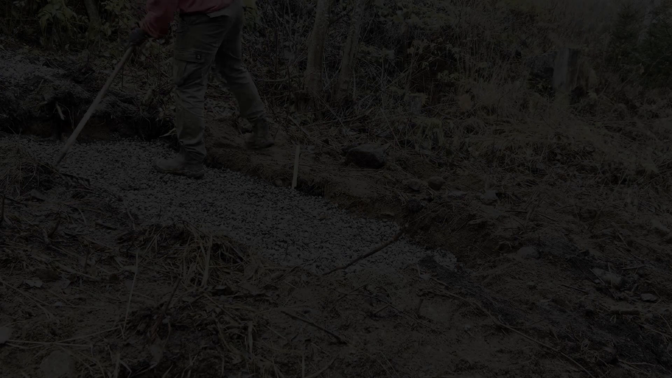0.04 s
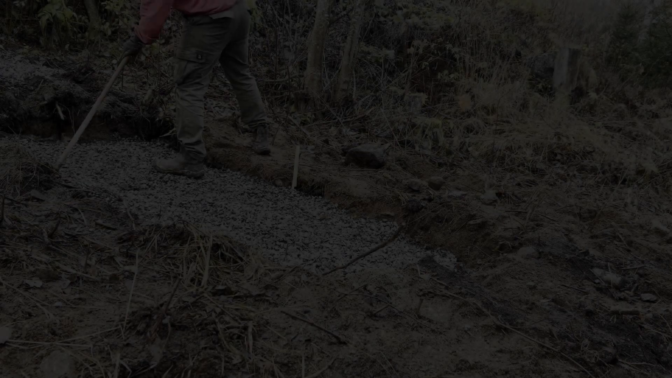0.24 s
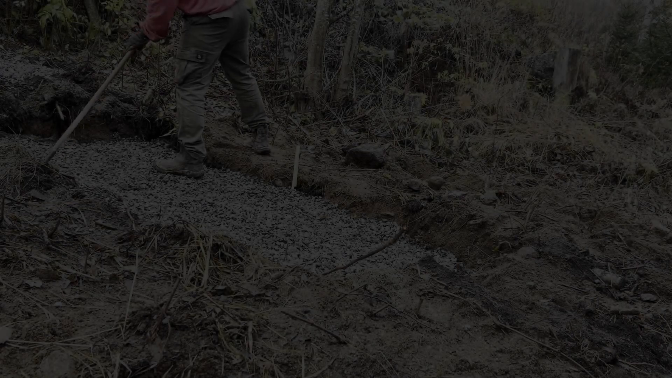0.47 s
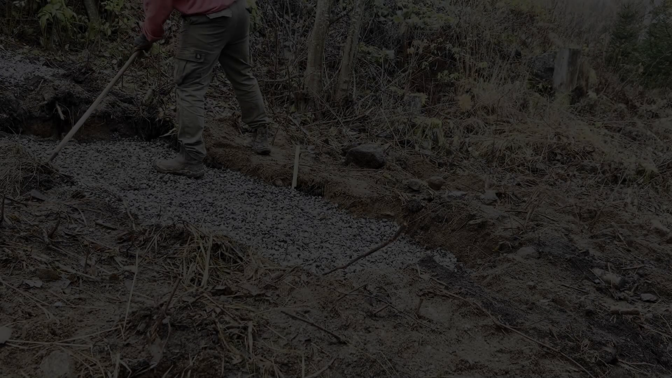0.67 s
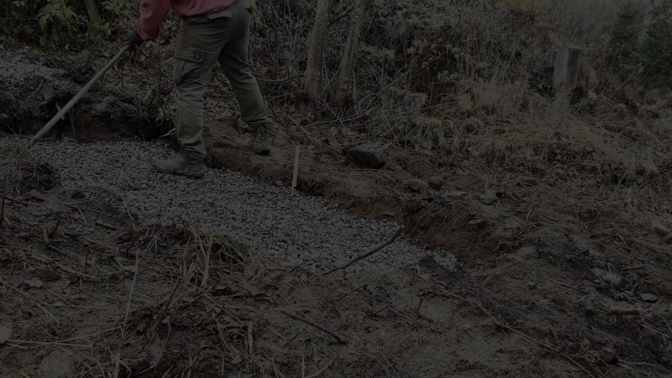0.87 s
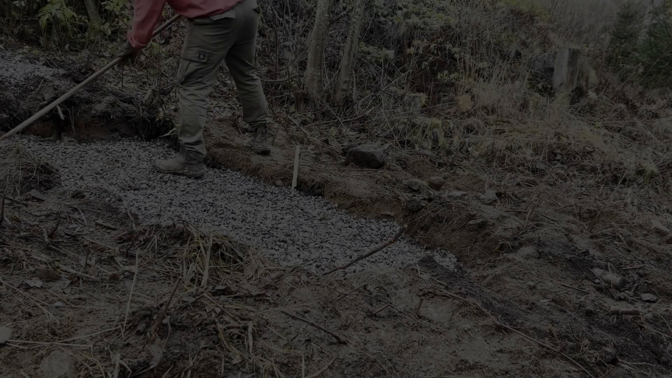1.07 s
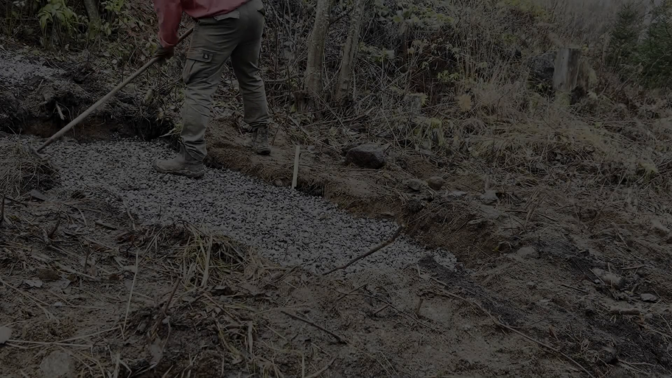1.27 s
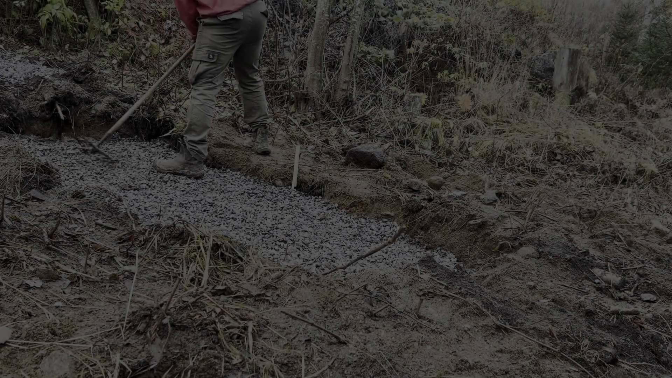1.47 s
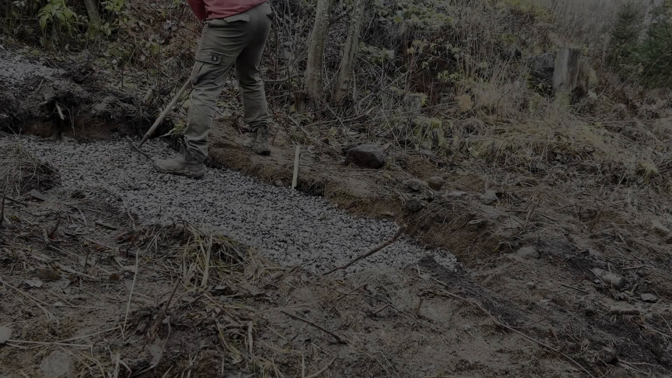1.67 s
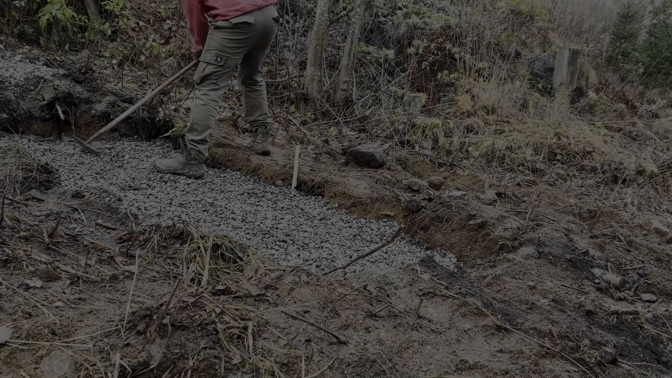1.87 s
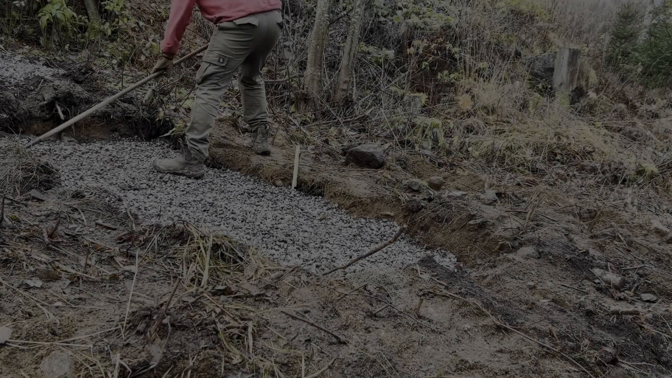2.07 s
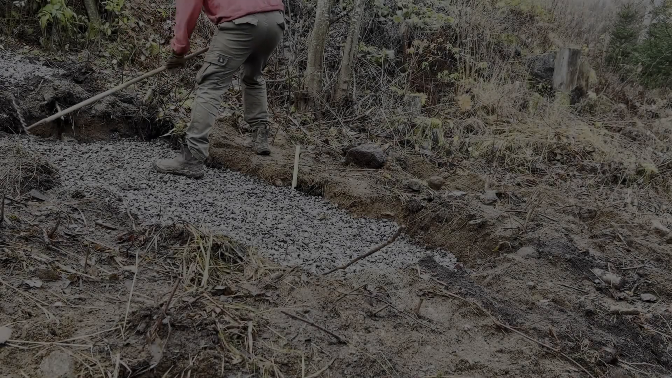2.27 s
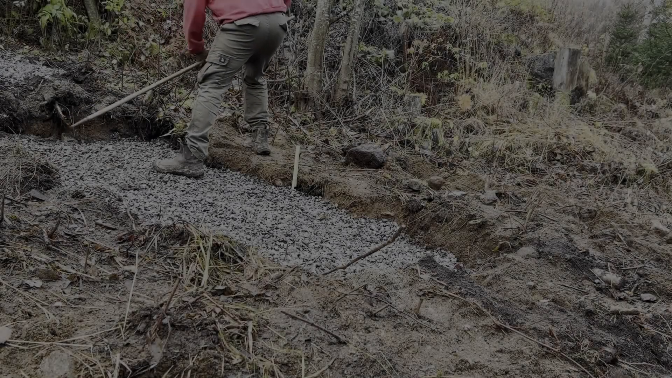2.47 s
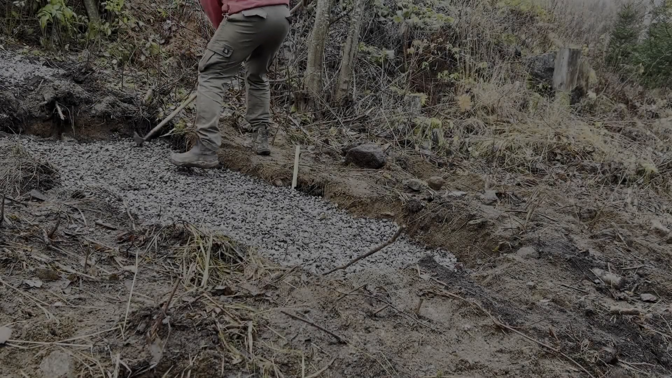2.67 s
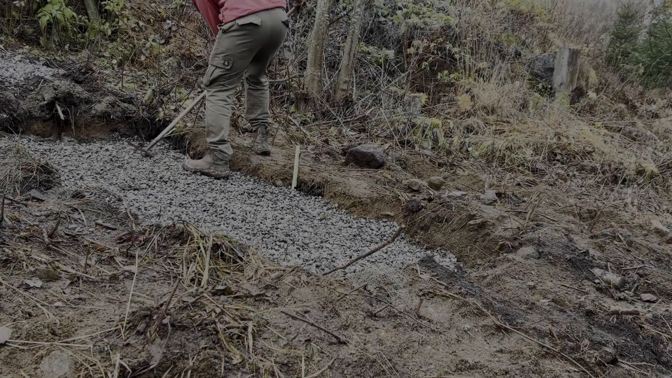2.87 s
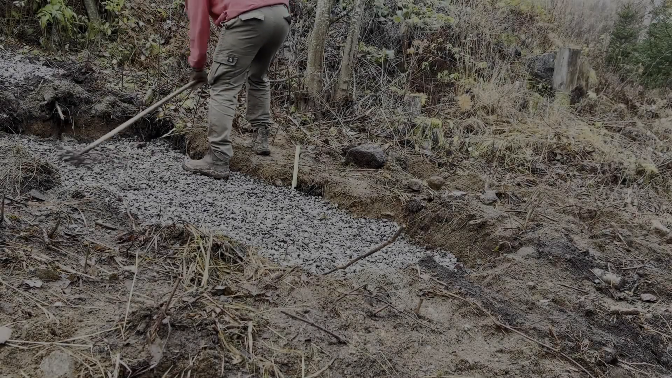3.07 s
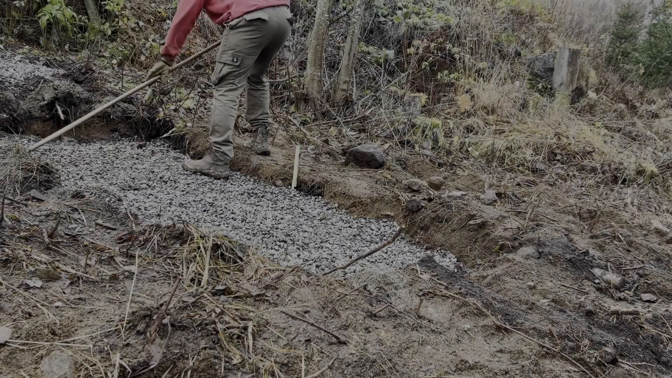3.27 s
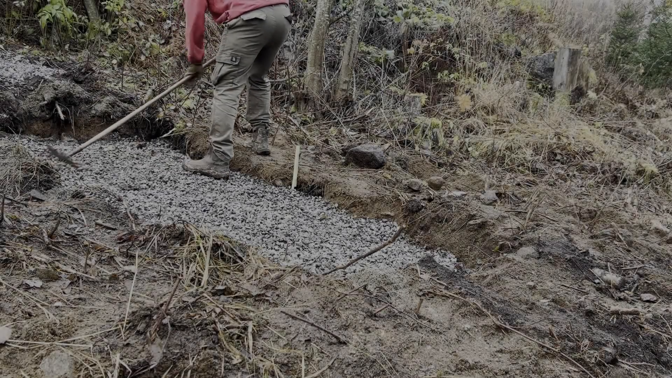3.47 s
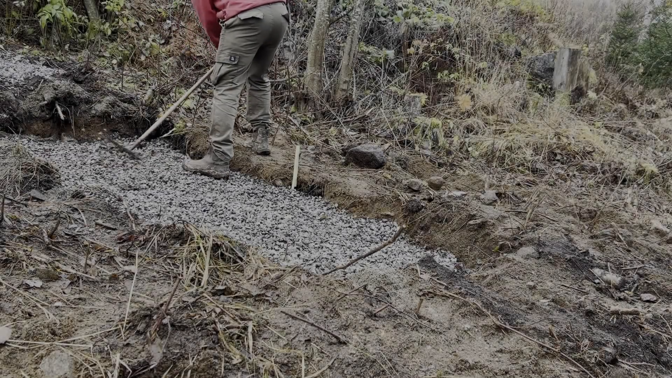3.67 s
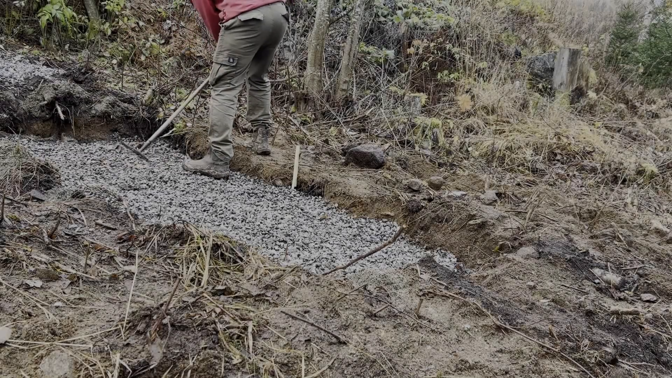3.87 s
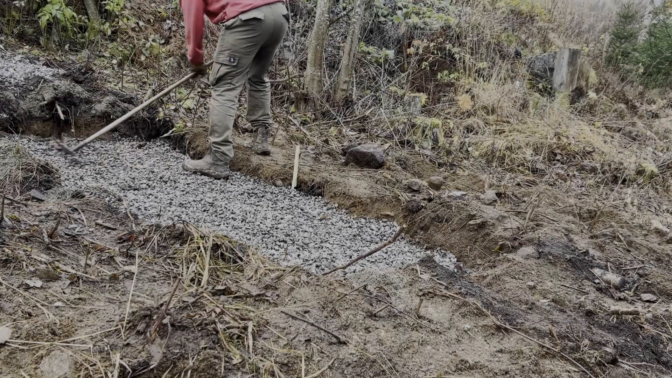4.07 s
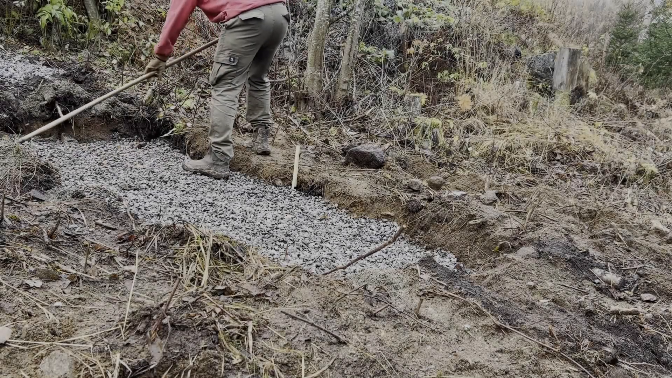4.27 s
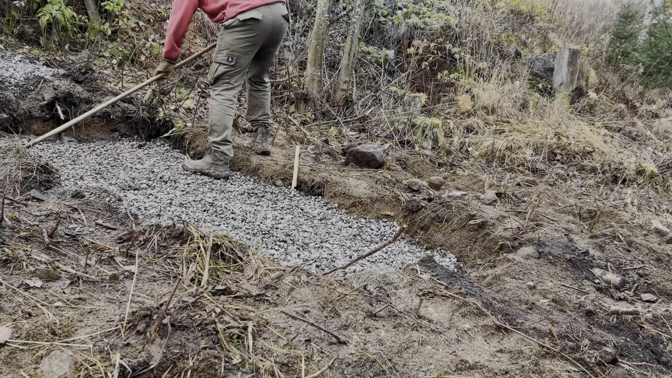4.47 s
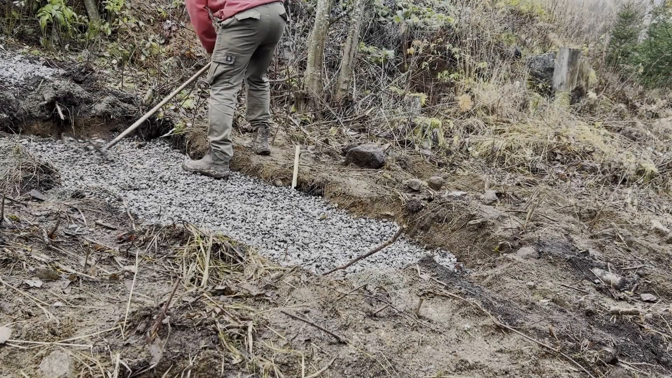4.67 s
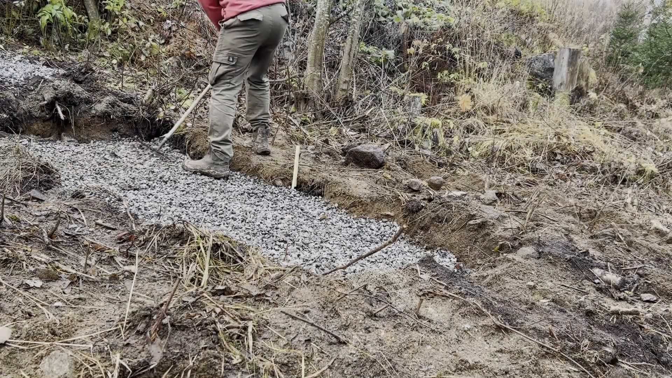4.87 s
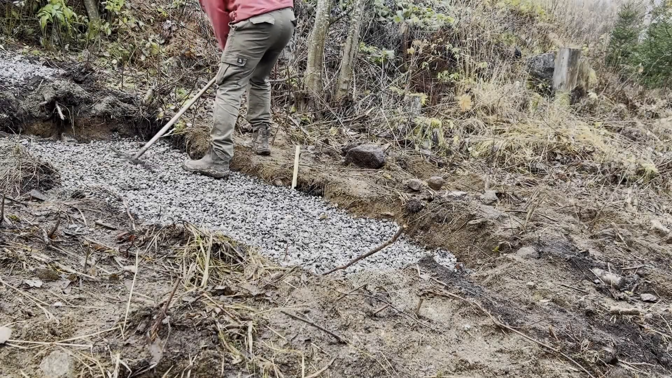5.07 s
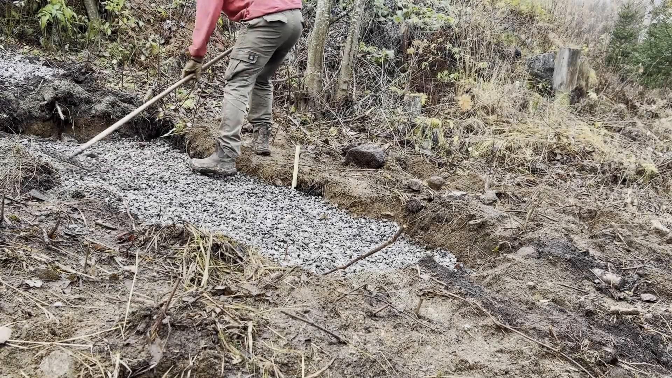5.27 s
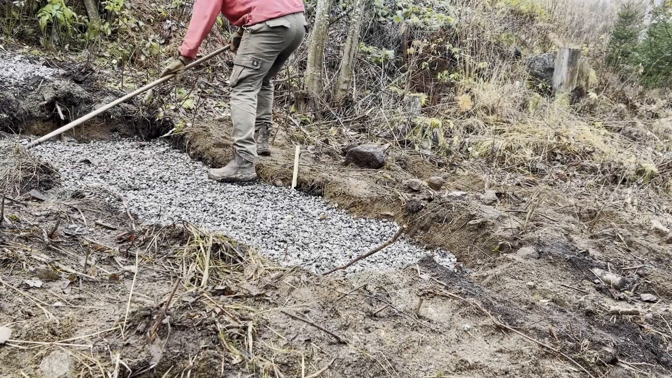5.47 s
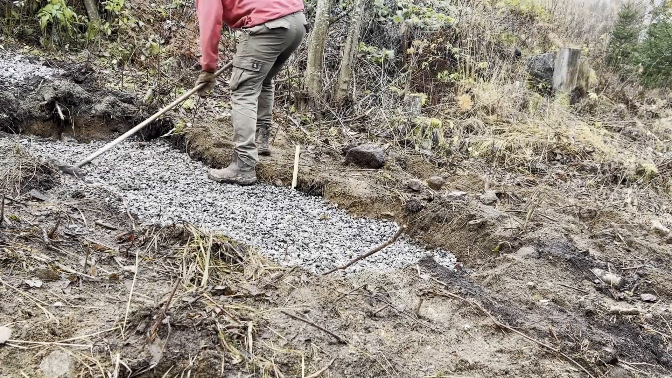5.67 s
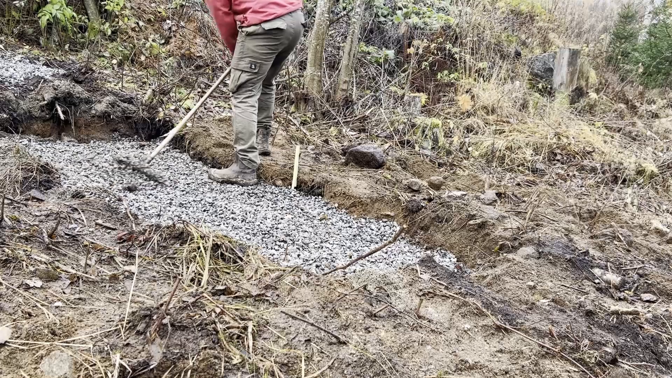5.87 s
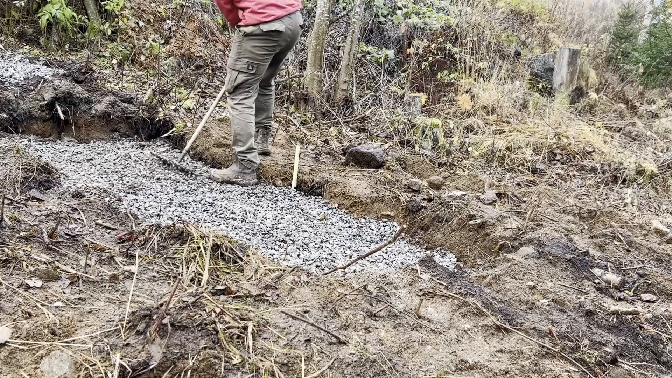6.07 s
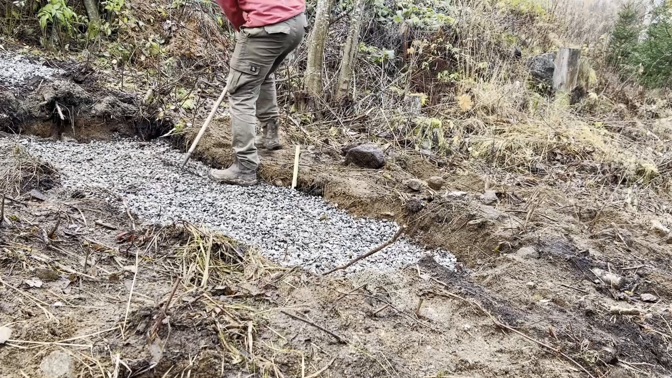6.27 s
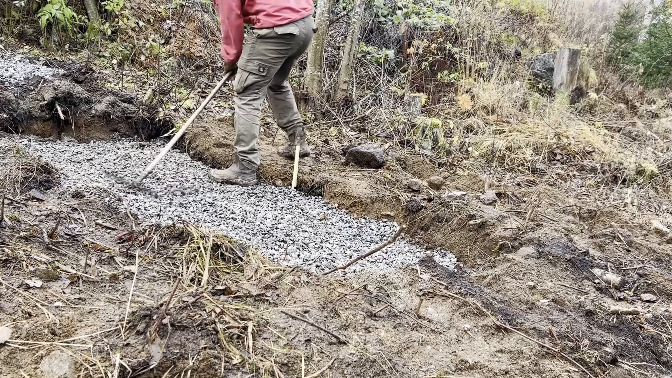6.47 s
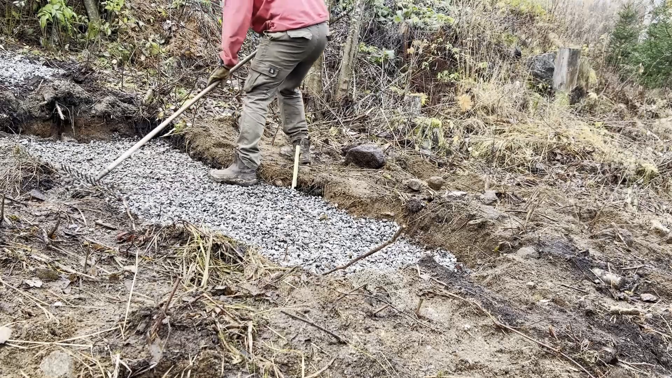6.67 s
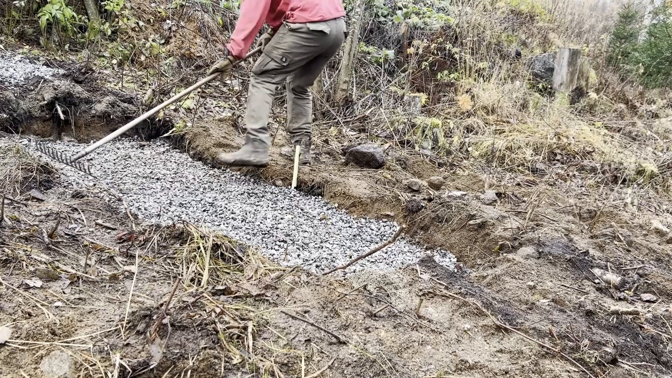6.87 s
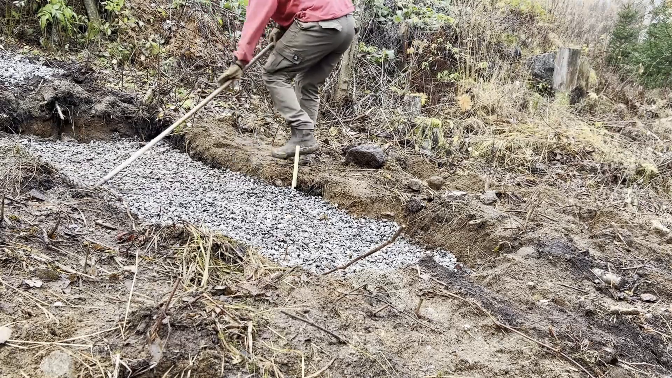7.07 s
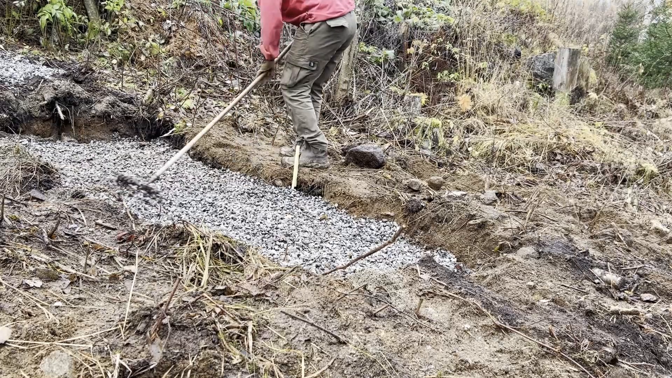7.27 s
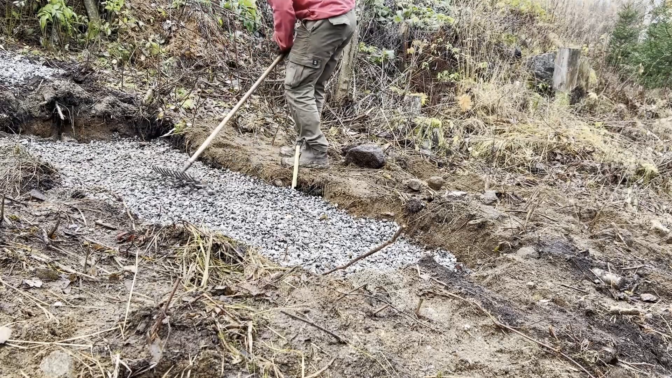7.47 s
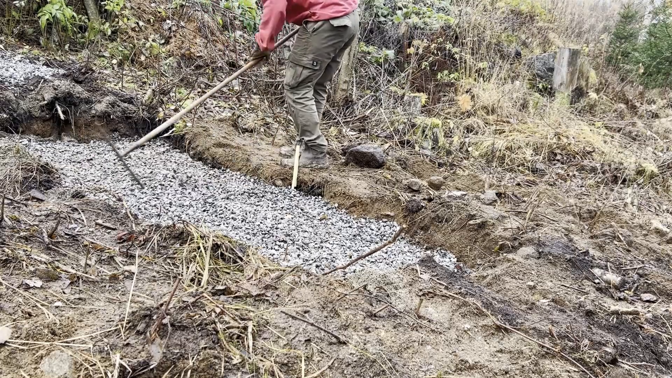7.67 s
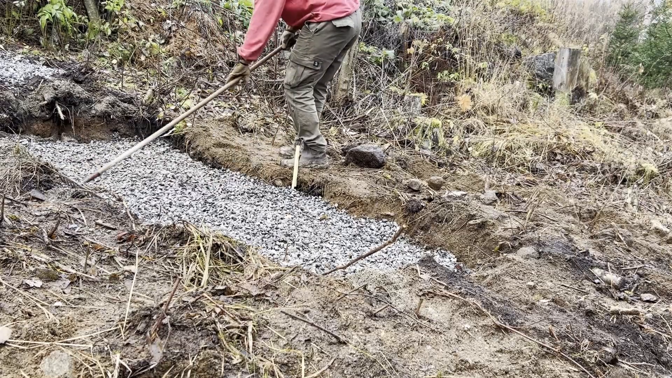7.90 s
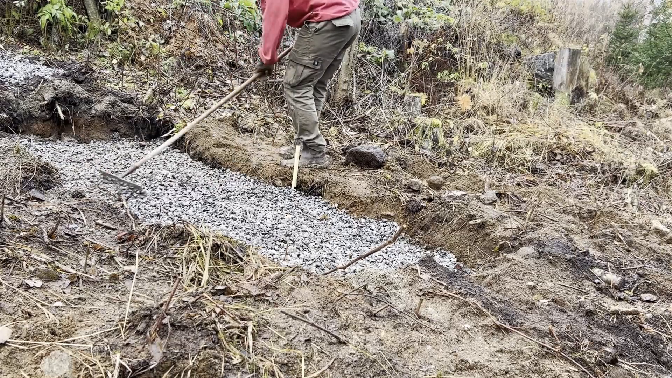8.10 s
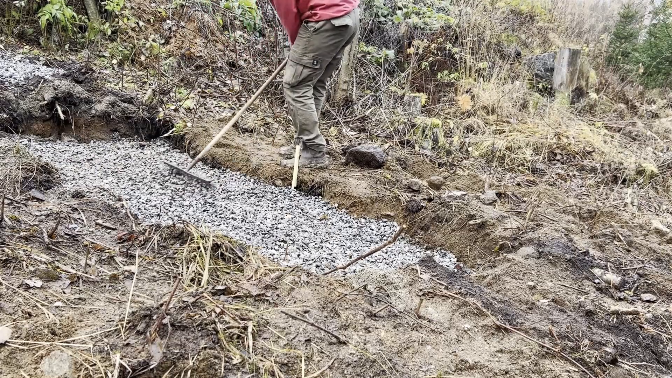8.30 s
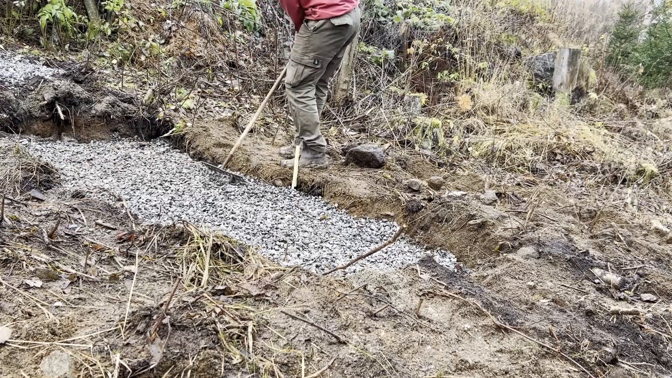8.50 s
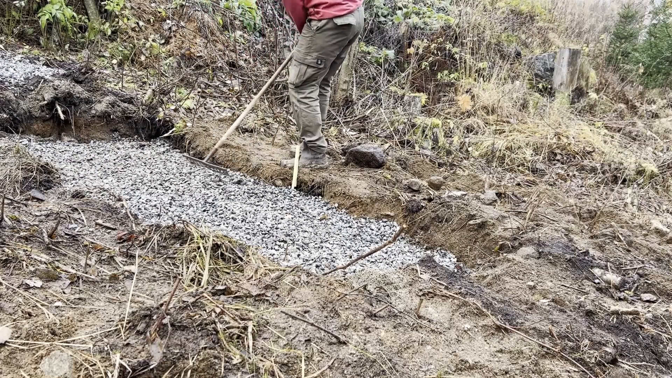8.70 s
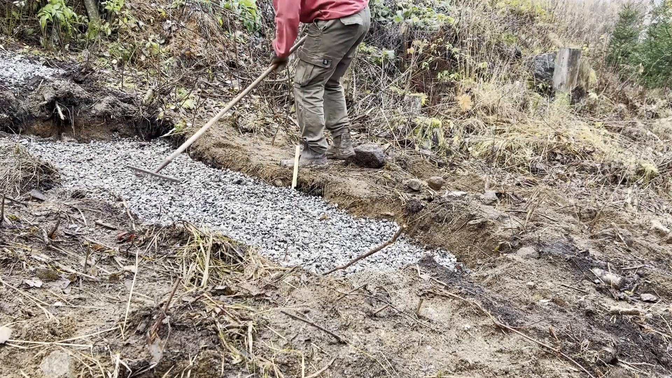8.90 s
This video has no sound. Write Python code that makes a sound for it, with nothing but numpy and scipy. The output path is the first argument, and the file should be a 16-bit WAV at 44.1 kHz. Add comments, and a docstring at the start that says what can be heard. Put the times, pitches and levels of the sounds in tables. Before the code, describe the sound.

Repeated gritty scrapes of a metal rake spreading gravel, with sharp clinks, soft thuds and trickling chips in quiet open air.

```python
"""A gritty crunch swells as a steel rake is drawn through crushed gravel in a trench outdoors.
Stroke after stroke, colliding chips, pebbles and coarse stones ring briefly, the smaller the higher;
the tines clink in their natural modes, the bed thuds, shoved stones judder and chips trickle after.
Single stones snap together, a breeze briefly buffets the microphone, and boots scuff the soil.
The trench walls and the trees reflect the work, which is heard from the left over faint open air."""
import sys
import numpy as np
from scipy import signal
from scipy.fft import rfft, irfft, next_fast_len
from scipy.io import wavfile
from scipy.ndimage import uniform_filter1d, map_coordinates

SR = 44100
rng = np.random.default_rng(int(sys.argv[2]) if len(sys.argv) > 2 else 0)


def int16_out(signal):
    """Quantize to a 16-bit WAV file."""
    q = np.round(np.clip(np.atleast_2d(signal).T, -1, 1) * 32767)
    wavfile.write(sys.argv[1], SR, q.astype(np.int16))


N = 394298


def amp(db):
    """Amplitude ratio of a level in decibels."""
    return 10 ** (np.asarray(db) / 20)


def unit(x):
    """Normalisation to rms 1."""
    return x / np.sqrt(np.mean(x ** 2) + 1e-20)


def steady(x, span_s):
    """Normalisation by the running rms: the grain stays, slow swells go."""
    return x / np.sqrt(np.abs(uniform_filter1d(x ** 2, max(int(span_s * SR), 2))) + 1e-20)


def wobble(rate):
    """Smooth random modulation: a spline through rate Gaussian knots a second."""
    knots = rng.standard_normal(4096)
    return map_coordinates(knots, [np.arange(N) * rate / SR], mode="wrap")


def filtered(x, response):
    """Linear filtering: the spectrum of x times a complex frequency response."""
    size = next_fast_len(x.shape[-1] + 8192)
    return irfft(rfft(x, size) * response(np.fft.rfftfreq(size, 1 / SR)), size)[..., :x.shape[-1]]


def coloured(x, spectrum):
    """Spectral shaping by (f/Hz, level/dB) points, at rms 1."""
    f, db = np.transpose(spectrum)
    return unit(filtered(x, lambda hz: amp(np.interp(np.log(hz + 1), np.log(f), db))))


def add(track, s, sound):
    """Superposition of a sound on a track at time s."""
    part = track[max(round(s * SR), 0):][:len(sound)]
    part += sound[:len(part)]


def drifting(x, responses, hop):
    """Time-varying convolution: impulse responses cross-fade, one every hop samples."""
    padded, window = np.pad(x, (hop, 2 * hop)), signal.get_window("hann", 2 * hop)
    out = np.zeros((responses.shape[1], N + SR))
    for start, response in zip(range(0, N + hop, hop), responses):
        piece = signal.fftconvolve((padded[start:start + 2 * hop] * window)[None], response, axes=1)
        out[:, start:start + piece.shape[1]] += piece
    return out[:, hop:hop + N]


def contacts(rate, spread_db, count):
    """A thinned point process of even mean power: each contact's sample, size and 0-1 stone shape."""
    when, chance, size, shape = rng.random((count, 4)).T
    at = (when * N).astype(int)
    share = np.minimum(rate[at] * N / SR / count, 1)
    keep = chance < share
    size = amp(spread_db * np.minimum(-np.log(size), np.pi)) / np.sqrt(share)
    return at[keep], size[keep], shape[keep]


def grains(at, size, shape, low_hz, high_hz, cycles, samples):
    """Damped free vibration: each contact rings a stone at its own pitch, down to 1/e after cycles."""
    hz = (low_hz + (high_hz - low_hz) * shape)[:, None]
    turns = hz * np.arange(samples) / SR
    rings = size[:, None] * np.sqrt(hz) * np.exp(-turns / cycles) * np.sin(2 * np.pi * turns)
    return np.bincount((at[:, None] + np.arange(samples)).ravel(), rings.ravel(), N + samples)[:N]


ENGAGE_S, SAG_DB, RELEASE_DB_PER_S = 0.0048, 13, 162  # the tines engage, the pull sags, the rake lets go
ARCH = 1.65  # exponent of the pull's arch: the higher, the flatter its top
CHIP_GROWTH, SCRAPE_GROWTH = 1.65, 1.06  # dB per dB of pull: a faster rake throws more chips
PEBBLE_FINENESS = 0.39  # pebbles move like coarse stones (0) or like small chips (1)
SETTLE_DB_PER_S, TRICKLE_CHIPS_DB = 79, 2.5  # the heap trickles on after a drag, mostly small chips
REST_DB = -99  # the bed between drags
# Pulls of the rake: start t/s, rise/s, fall/s, coarse-stone peak level/dB, swell to the peak/dB,
# then level/dB re that peak of chips, pebbles, trickle, steel scrape. All tables give relative levels.
RAKE_PULLS = [(0.0, 0.025, 0.12, -57.5, 0.45, -1, -2, -10, -5),
              (0.188, .16, 0.046, -46, 1.1, -2.5, 2, -5, -7.5),
              (0.494, 0.22, 0.071, -48.5, 8.6, -0.5, 3.5, -7, -10),
              (1.002, 0.27, 0.19, -46, 13.4, 2.5, 4.5, -3, -2),
              (1.508, 0.12, 0.07, -44.5, 5.5, 4, 5.5, -10, -16),
              (1.718, 0.14, 0.03, -44, 8.3, 7, 5.5, -17, -4),
              (1.936, 0.044, 0.089, -39.5, 2.6, 5, 4, -24, -5),
              (2.335, 0.03, 0.019, -44.5, 22, -5.5, 2, -12, -1),
              (2.469, 0.016, 0.17, -64.5, 0.88, 2, 3, 1, -17),
              (2.756, 0.3, 0.23, -44.5, 7.4, 9, 8.5, -33, -3),
              (3.299, 0.074, 0.037, -51, 3.5, -2.5, 8.5, -1, -4),
              (3.397, 0.11, 0.25, -43.5, 5.3, 7.5, 8.5, -8.5, 2),
              (3.864, 0.21, 0.15, -42.5, 8.3, 8, 7, -17.5, 0),
              (4.418, 0.2, 0.16, -43.5, 13, 7, 6, -16.5, 2),
              (4.802, 0.012, 0.16, -55.5, 2.1, 11.5, 12, -6.5, -18),
              (4.994, 0.13, 0.094, -41, 7, 8, 7.5, -15, -10),
              (5.463, 0.0068, 0.091, -58.5, 3, 5.5, 6, -11, -9),
              (5.595, 0.23, 0.42, -43, 7, 9.5, 9, -16.5, -5.5),
              (6.297, 0.13, 0.069, -43.5, 6, 11.5, 7.5, -18, -1.5),
              (6.483, 0.019, 0.13, -37.5, 1, 6.5, 3, -17, -2.5),
              (7.061, 0.21, 0.21, -43, 6.5, 8.5, 7.5, -21, -11),
              (7.438, 0.066, 0.18, -58.5, 2, 17.5, 15, -19.5, -14),
              (7.906, 0.31, 0.235, -41.5, 15.2, 10, 10, -21.5, -1.5),
              (8.463, 0.068, 0.08, -57, 12, 14.5, 12.5, -32, 5)]


def drags():
    """Incoherent sources add in power: the pulls' envelopes for chips, pebbles, stones and steel."""
    t, power = np.arange(SR + SR // 4) / SR, np.zeros((4, N))
    for start, rise, fall, db, swell_db, chips_db, pebbles_db, trickle_db, scrape_db in RAKE_PULLS:
        to_peak, past_peak = np.clip(1 - t / rise, 0, 1), np.clip((t - rise) / fall, 0, 1)
        after = np.maximum(t - rise - fall, 0)
        pull_db = -swell_db * to_peak ** ARCH - SAG_DB * past_peak ** ARCH - RELEASE_DB_PER_S * after
        engaged = np.minimum(t / ENGAGE_S, 1)
        trickle = past_peak * amp(trickle_db - SETTLE_DB_PER_S * after)
        coarse = np.hypot(engaged * amp(pull_db), trickle)
        fine = np.hypot(engaged * amp(CHIP_GROWTH * pull_db), amp(TRICKLE_CHIPS_DB) * trickle)
        middling = coarse ** (1 - PEBBLE_FINENESS) * fine ** PEBBLE_FINENESS
        scrape = engaged * amp(scrape_db + SCRAPE_GROWTH * pull_db)
        stirs = amp(chips_db) * fine, amp(pebbles_db) * middling, coarse, scrape
        for track, stir in zip(power, stirs):
            add(track, start, (amp(db) * stir) ** 2)
    return np.sqrt(power + amp(REST_DB) ** 2)


# The rake head bites into the bed: t/s, chip level/dB, coarse-stone level/dB, duration/s
RAKE_BITES = [(0.23, -27.5, -35, 0.0095), (0.503, -41.5, -40, 0.026), (1.017, -43, -43.5, 0.048),
              (1.43, -30, -47, 0.011), (1.52, -30, -42, 0.02), (1.579, -32, -36, 0.0072),
              (1.876, -32, -50, 0.016), (2.175, -60.5, -47, 0.03), (2.297, -53, -49.5, 0.04),
              (2.334, -36, -44.5, 0.02), (2.67, -31.5, -36, 0.032), (3.098, -18.5, -41, 0.0057),
              (3.24, -46, -44, 0.0075), (3.593, -28.5, -42.5, 0.051), (4.35, -66, -49, 0.046),
              (4.581, -36.5, -48, 0.029), (4.677, -27.5, -45, 0.046), (5.114, -26, -41, 0.016),
              (5.192, -32, -42.5, 0.042), (5.595, -38, -32, 0.013), (5.767, -30, -35.5, 0.014),
              (6.155, -34, -43, 0.011), (6.449, -21.5, -43, 0.008), (6.495, -30.5, -41, 0.013),
              (7.063, -29.5, -31.5, 0.014), (7.323, -31, -43, 0.048), (7.907, -33.5, -35, 0.028),
              (8.235, -25, -35, 0.014), (8.275, -31.5, -39, 0.028), (8.337, -30, -35.5, 0.017)]


def agitation(chip_bite_db, pebble_bite_db, stone_bite_db, steel_bite_db, jerk_db):
    """Sustained and impulsive excitation: jerky drags and bites stir chips, pebbles, stones and steel."""
    stirs = drags() * amp(jerk_db * wobble(120))
    t = np.arange(SR // 5) / SR
    for s, chip_db, stone_db, length in RAKE_BITES:
        burst = (1 - np.exp(-t / 0.0026)) * np.exp(-(t / length) ** 2)
        pebble_db = stone_db + PEBBLE_FINENESS * (chip_db - stone_db)
        levels = (chip_db + chip_bite_db, pebble_db + pebble_bite_db,
                  stone_db + stone_bite_db, stone_db + steel_bite_db)
        for track, db in zip(stirs, levels):
            add(track, s, burst * amp(db))
    return stirs


# Spectral envelope of the chips' ticks: f/Hz, level/dB
CHIP_SPECTRUM = [(2500, -43), (4800, -22.5), (5700, -3.5), (7200, -5), (8200, -0.5), (10200, 0),
                 (12000, -1.5), (16000, -1.5)]


def small_chips(stir):
    """Small bodies vibrate fast: ticks merge to a hiss under the rake and thin out as the heap settles."""
    rate = 300 + 8000 * stir / amp(-33.5)
    hits = contacts(rate, spread_db=1.5, count=90000)
    ticks = grains(*hits, low_hz=3500, high_hz=16140, cycles=1.0, samples=40)
    return stir * coloured(ticks, CHIP_SPECTRUM)


# Spectral envelope of the coarse stones' clacks: f/Hz, level/dB
STONE_SPECTRUM = [(350, -17.5), (800, -5.5), (1100, 1), (1500, 0), (2000, 4), (2700, 2), (4000, -2)]


def coarse_stones(stir):
    """Natural frequency falls with size: big stones grind and clack with short, lower rings."""
    rate = 900 + 2500 * (stir / amp(-41.0)) ** .7
    hits = contacts(rate, spread_db=2.5, count=32000)
    clacks = grains(*hits, low_hz=640, high_hz=3830, cycles=1.96, samples=200)
    return stir * steady(coloured(clacks, STONE_SPECTRUM), span_s=0.028)


# Spectral envelope of the pebbles' rattle: f/Hz, level/dB
PEBBLE_SPECTRUM = [(1500, -44), (2600, -5.5), (3200, -3), (4000, -1), (5000, -0.5), (7000, 5)]


def pebbles(stir):
    """Collision rate grows with agitation: pebbles rattle at pitches between the two other sizes."""
    rate = 600 + 3300 * (stir / amp(-38.5)) ** .8
    hits = contacts(rate, spread_db=2.5, count=45000)
    rattle = grains(*hits, low_hz=1920, high_hz=7230, cycles=2.6, samples=100)
    return stir * coloured(rattle, PEBBLE_SPECTRUM)


# Spectrum of quiet woodland air: f/Hz, level/dB
AIR_SPECTRUM = [(20, -20), (60, -24), (200, -3.5), (500, -2), (1000, -9.5), (2500, -19), (8000, -24),
                (16000, -57)]


def open_air(air_db):
    """A diffuse field: faint noise, only weakly correlated between the two microphone ports."""
    common = rng.standard_normal(N)
    return amp(air_db) * coloured(common + 2.3 * rng.standard_normal((2, N)), AIR_SPECTRUM)


FOCUS_DB_PER_OCTAVE = 13  # modes further from the struck one answer less
# Natural modes of the steel head: f/Hz, level/dB, decay time T60/s
TINE_MODES = [(1049, -8.5, 0.086), (1637, -2.5, 0.04), (1958, 1, 0.04), (2068, -2.5, 0.033),
              (2500, 0.5, 0.074), (2712, -6.5, 0.1), (2850, -4.5, 0.07), (3537, 0.5, 0.069),
              (3755, -0.5, 0.05), (4634, -2.5, 0.05), (5331, -5, 0.04), (5710, 1.5, 0.043), (9770, 4, 0.04),
              (10200, 6.5, 0.057), (11200, 9, 0.055)]


def tine_ring(t, scatter_db, count, focus_hz=None, detune=0):
    """Modal superposition for count blows: gains vary with the point struck, pitches with the load."""
    hz, db, t60 = np.transpose(TINE_MODES)
    strength, side, load = rng.standard_normal((count, 3, len(hz))).transpose(1, 0, 2)
    loaded_hz = hz * (1 + detune * load)
    modes = amp(-60 * t / t60[:, None]) * np.sin(2 * np.pi * loaded_hz[:, :, None] * t)
    off_db = 0 if focus_hz is None else FOCUS_DB_PER_OCTAVE * np.abs(np.log2(hz / focus_hz[:, None]))
    gains = amp(db + scatter_db * strength - off_db) * np.sign(side)
    return np.sum(gains[:, :, None] * modes, axis=1)


# A tine strikes a stone hard: t/s, level/dB, f/Hz around which it rings most
TINE_STRIKES = [(0.235, -37, 2000), (2.359, -42, 2520), (2.684, -33, 4730), (3.078, -30, 3500),
                (3.137, -33, 3500), (3.163, -26.5, 2580), (3.198, -32, 3600), (3.241, -29.5, 3700),
                (3.309, -36, 2500), (4.586, -33, 2000), (5.215, -30.5, 3500), (7.068, -29.5, 2000),
                (7.912, -43, 2410)]


def rake_head(stir, drag_db, clink_db):
    """Impact-driven resonance: light taps keep the steel ringing; hard blows clink and chatter."""
    hop, t = SR // 14, np.arange(SR // 11) / SR
    at, size, _ = contacts(np.full(N, 800.), spread_db=2.0, count=8000)
    taps = steady(np.bincount(at, size, N), span_s=.03) * stir * amp(drag_db)
    responses = tine_ring(t, scatter_db=4.0, count=N // hop + 2, detune=0.011)
    responses /= np.linalg.norm(responses, axis=1, keepdims=True)
    ring = drifting(taps, responses[:, None], hop)[0]
    blows = tine_ring(t, scatter_db=-2.0, count=len(TINE_STRIKES), focus_hz=np.array(TINE_STRIKES)[:, 2])
    rebounds = 0.047 * rng.standard_normal(blows.shape) ** 3 * np.exp(-t / 0.0096)
    chatters = (t == 0) + rebounds
    for (s, db, _), blow, chatter in zip(TINE_STRIKES, blows, chatters):
        clink = signal.fftconvolve(blow, chatter)
        add(ring, s, amp(db + clink_db) * clink / np.abs(clink).max())
    return ring


# Spectrum of the gravel bed's grumble: f/Hz, level/dB
BED_SPECTRUM = [(28, -28), (58, 14), (140, 1.5), (240, 3.5), (380, -1), (600, 1.5), (850, -9), (1800, -10),
                (5000, -64.5)]


def bed_grumble(stir, bed_db):
    """Forced vibration: the bed gives a low noise that follows the stirring of the coarse stones."""
    return amp(bed_db) * stir * steady(coloured(rng.standard_normal(N), BED_SPECTRUM), span_s=0.04)


# The rake's weight lands on the ground: t/s, level/dB
RAKE_LANDINGS = [(0.24, -46.5), (3.242, -58), (5.601, -40), (6.494, -43), (7.069, -36), (7.913, -48)]


def ground_thuds(thump_db, thump_hz, glide_hz):
    """A damped oscillator on a yielding support: each thud sinks in pitch as the stones give way."""
    track, t = np.zeros(N), np.arange(SR // 4) / SR
    stumble = 1.7 * wobble(170)  # radians: the stones give way unevenly
    tunings = np.exp(0.078 * rng.standard_normal(len(RAKE_LANDINGS)))
    envelope = np.exp(-t / 0.051) * (1 - np.exp(-t / 0.0012))
    for (s, db), tuning in zip(RAKE_LANDINGS, tunings):
        hz = tuning * (thump_hz + glide_hz * np.exp(-t / 0.0106))
        jitter = stumble[round(s * SR):][:len(t)] * np.exp(-t / 0.036)
        thud = envelope * np.sin(2 * np.pi * np.cumsum(hz) / SR + jitter)
        add(track, s, amp(db + thump_db) * thud)
    return track


# A stone is shoved over its neighbours: t/s, duration/s, its own f/Hz, level/dB
SHOVED_STONES = [(0.29, 0.17, 1840, -54.5), (0.828, 0.043, 2470, -56), (1.066, 0.65, 1110, -65),
                 (2.186, 0.019, 2840, -52), (2.668, 0.024, 5800, -36.5), (3.065, 0.057, 1470, -49),
                 (3.42, 0.16, 2730, -51.5), (5.129, 0.17, 2210, -48), (5.59, 0.029, 3150, -38),
                 (5.643, 0.33, 2000, -50), (6.315, 0.3, 3600, -50.5), (6.508, 0.23, 2220, -51),
                 (7.076, 0.25, 2460, -46), (7.28, 0.21, 3200, -47), (7.967, 0.2, 2730, -50.5),
                 (8.224, 0.12, 1410, -48.5)]


def juddering_stones(judder_db, pitch_spread):
    """Repeated impact on one resonator: an uneven run of knocks that swells early and fades."""
    track = np.zeros(N)
    at, size, shape = contacts(np.full(N, 700.), spread_db=2.5, count=8000)
    for s, length, hz, db in SHOVED_STONES:
        progress = (at / SR - s) / length
        on = (progress > 0) & (progress < 1)
        arch = np.sin(np.pi * np.sqrt(progress[on]))
        low_hz, high_hz = hz * (1 - pitch_spread), hz * (1 + pitch_spread)
        knocks = grains(at[on], size[on] * arch, shape[on], low_hz, high_hz, cycles=3.5, samples=600)
        track += amp(db + judder_db) * unit(knocks) * np.sqrt(length * SR / N)
    return track


# Single stones snap together: t/s, level/dB
STONE_COLLISIONS = [(1.363, -23), (1.4383, -23), (6.502, -16), (7.438, -19), (7.5576, -26), (7.6184, -25),
                    (8.227, -16), (8.472, -20), (8.558, -19.5), (8.675, -29)]


def stone_snaps(snap_db):
    """A brief contact has a broad spectrum: each hard collision gives one bright crack."""
    track, t = np.zeros(N), np.arange(SR // 100) / SR
    cracks = rng.standard_normal((len(STONE_COLLISIONS), len(t))) * np.exp(-t / 0.001)
    cracks = signal.lfilter(*signal.butter(2, [6500, 15000], "band", fs=SR), cracks)
    for (s, db), crack in zip(STONE_COLLISIONS, cracks):
        add(track, s, amp(db + snap_db) * crack / np.abs(crack).max())
    return track


# Gusts at the microphone: crest t/s, level/dB, half-width to 1/e amplitude/s
WIND_GUSTS = [(2.53, -43, 0.031), (2.928, -43.5, 0.037), (3.115, -44, 0.076), (3.254, -34.5, 0.014),
              (3.626, -38, 0.081), (3.724, -32.5, 0.029), (3.986, -35.5, 0.045), (4.213, -32, 0.057)]
# Spectrum of their buffeting: f/Hz, level/dB
BUFFET_SPECTRUM = [(18, -31), (32, -14), (52, 5.5), (75, 0), (105, -3.5), (160, -19.5), (300, -34),
                   (1200, -91)]


def wind(buffet_db, calm_db):
    """Turbulent pressure, nearly alike in both ports: gusts rumble on a breeze that rises and dies once."""
    t = np.arange(N) / SR
    swell = lambda crest_s, db, half_s: amp(db) * np.exp(-((t - crest_s) / half_s) ** 2)
    breeze = swell(crest_s=3.02, db=-51, half_s=1.53)
    strength = amp(calm_db) + breeze + sum(swell(*gust) for gust in WIND_GUSTS)
    rumble = coloured(rng.standard_normal(N) + 0.29 * rng.standard_normal((2, N)), BUFFET_SPECTRUM)
    return rumble * strength * amp(buffet_db + 2.3 * wobble(22.05))


# Boots shift at the trench's edge: t/s, level/dB, duration/s
BOOT_SCUFFS = [(2.724, -52, 0.21), (3.315, -54.5, 0.056), (5.447, -56, 0.23), (6.155, -47.5, 0.029),
               (6.676, -53, 0.018), (6.712, -55, 0.059)]
# Spectrum of scuffed soil: f/Hz, level/dB
SOIL_SPECTRUM = [(50, -27), (130, -15), (260, -3), (380, -9.5), (620, -7.5), (1100, -23), (4000, -24),
                 (16000, -34)]


def boots():
    """Sliding friction: soles on soft soil give dull, uneven bursts of noise."""
    press, t = np.zeros(N), np.arange(SR // 2) / SR
    for s, db, length in BOOT_SCUFFS:
        progress = t / max(length, .02)
        add(press, s, amp(db) * (1 - np.exp(-progress * 8)) * np.exp(-progress ** 4))
    friction = rng.standard_normal(N) * amp(3.9 * wobble(120))
    return press * coloured(friction, SOIL_SPECTRUM)


def reflections(x, walls_db, walls_t60, woods_db, woods_t60, woods_hz):
    """Diffuse reflection: quick off the trench walls, dull from the trees, changing as the rake moves."""
    hop, t = SR // 14, np.arange(SR // 6) / SR
    noise = rng.standard_normal((N // hop + 2, 2, 2, len(t)))
    decay = lambda t60: unit(amp(-60 * t / t60) * (1 - np.exp(-t / 0.0009))) / np.sqrt(len(t))
    walls = amp(walls_db) * decay(walls_t60) * noise[:, 0]
    woods = amp(woods_db) * decay(woods_t60) * noise[:, 1]
    dull_woods = signal.lfilter(*signal.butter(1, woods_hz, fs=SR), woods)
    return drifting(x, walls + dull_woods, hop)


# Left microphone port relative to the right: f/Hz, phase lead/rad, level/dB
PORT_DIFFERENCES = [(0, 0, 0), (300, 0, -.5), (900, .5, 1.5), (1550, 1.15, 3.5), (1950, .7, 3.8),
                    (2300, -.1, 0), (3200, 0, -3), (4600, -.1, -3.3), (5100, -.2, 1), (5400, 2, -5.5),
                    (6500, 2.2, -3), (7500, 4, -1.5), (9000, 6, 0), (16000, 12.8, 0)]


def from_the_left(x):
    """Phase and level differences, half at each port, place the source on the left."""
    f, lead, tilt_db = np.transpose(PORT_DIFFERENCES)
    half = lambda hz: amp(np.interp(hz, f, tilt_db) / 2) * np.exp(.5j * np.interp(hz, f, lead))
    return filtered(x, lambda hz: np.array([half(hz), 1 / half(hz)]))


def scene():
    """Superposition of rake, gravel and boots, their reflections, and the open air around."""
    chips, middling, stones, steel = agitation(
        chip_bite_db=-4.0, pebble_bite_db=1.5, stone_bite_db=-4.0, steel_bite_db=-4.5, jerk_db=1.5)
    work = amp(0.17) * small_chips(chips) + stone_snaps(snap_db=-2.0)
    work += amp(-8.5) * coarse_stones(stones) + amp(-10.5) * pebbles(middling)
    work += rake_head(steel, drag_db=-1.5, clink_db=-3.5) + boots()
    work += juddering_stones(judder_db=-4.5, pitch_spread=0.15)
    ground = bed_grumble(stones, bed_db=-13.5) + ground_thuds(thump_db=-2.5, thump_hz=54.0, glide_hz=134)
    # long waves pass over the shallow walls, so less of the thudding comes back
    echo = reflections(work + amp(-4.5) * ground, walls_db=-3.5, walls_t60=0.028,
                       woods_db=-1.5, woods_t60=0.17, woods_hz=920)
    background = wind(buffet_db=-1.0, calm_db=-72.5) + open_air(air_db=-63.0)
    fade_out = np.minimum(np.arange(N)[::-1] / SR / 0.21, 1)
    return from_the_left(work + ground + echo) + fade_out * background


def record(dry):
    """Band limiting: a steep low-pass removes the highest treble."""
    cutoff_hz = 15850
    return filtered(dry, lambda hz: 1 / (1 + np.minimum(hz / cutoff_hz, 2) ** 200))


dry = scene()
out = record(dry)
int16_out(out)
```